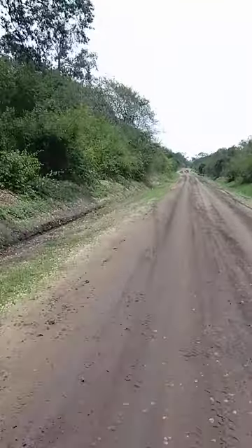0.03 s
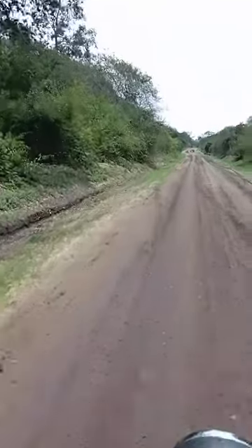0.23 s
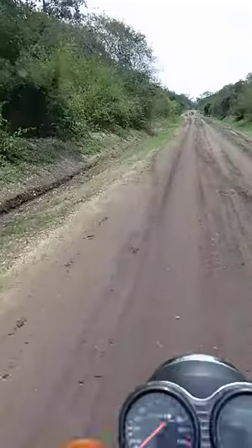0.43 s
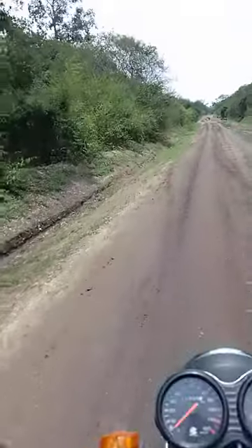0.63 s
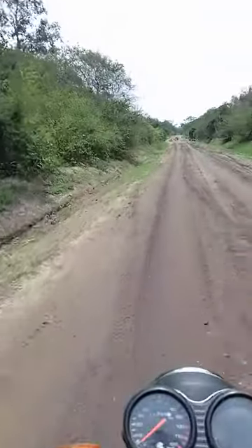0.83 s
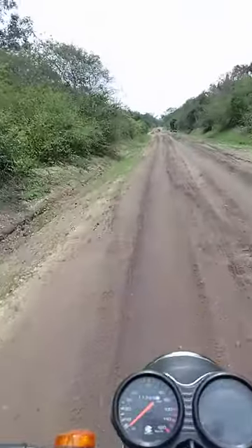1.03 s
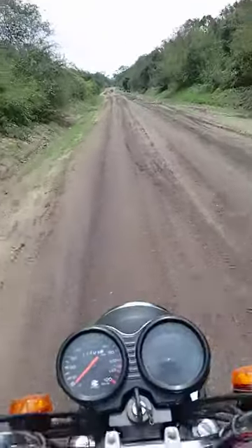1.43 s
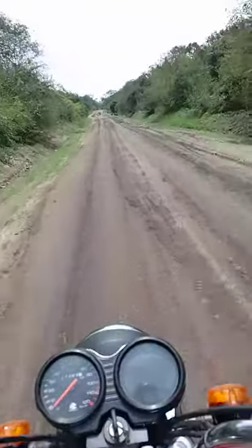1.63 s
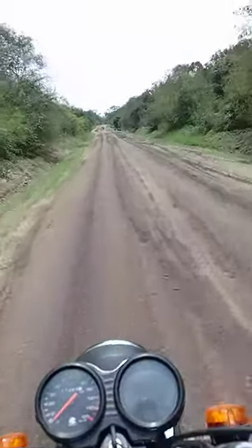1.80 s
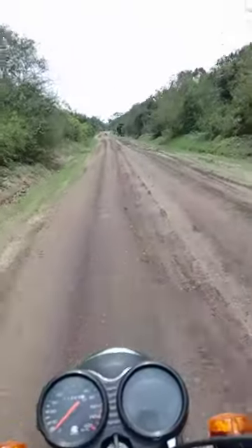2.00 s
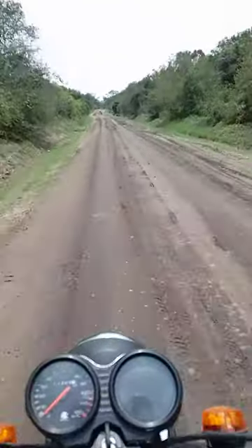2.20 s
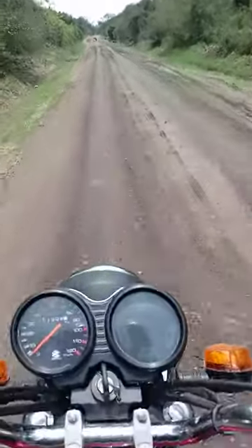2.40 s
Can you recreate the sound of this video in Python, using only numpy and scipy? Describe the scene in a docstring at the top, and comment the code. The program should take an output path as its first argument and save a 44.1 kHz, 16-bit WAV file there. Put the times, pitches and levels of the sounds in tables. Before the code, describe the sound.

A motorcycle engine thuds and clatters at low revs, heard from the saddle through gusty wind.

```python
"""A dirt road, heard from the saddle of a single-cylinder four-stroke motorcycle rolling at low revs.
Wind flutters on the microphone and now and then buffets it hard; handling adds a deep rumble.
Tyres crunch grit, loose parts rattle over bumps, the drive chain rasps and the valve gear clatters.
The exhaust thuds through the silencer once a cycle and fades as the throttle eases."""
import sys
import numpy as np
from scipy import signal
from scipy.fft import rfft, irfft, next_fast_len
from scipy.io import wavfile
from scipy.ndimage import uniform_filter1d

SR = 44100
rng = np.random.default_rng(int(sys.argv[2]) if len(sys.argv) > 2 else 0)


def persist_wave(psi):
    """Save psi, clipped to +-1, as 16-bit WAV."""
    counts = np.round(np.clip(psi, -1, 1) * 32767).astype(np.int16)
    wavfile.write(sys.argv[1], SR, np.atleast_2d(counts).T)


N = 112454
T = np.arange(N) / SR


def undb(db):
    """Decibels to gain."""
    return 10 ** (np.asarray(db) / 20)


def unit(x):
    """Scale to rms 1."""
    return x / np.sqrt(np.mean(x ** 2) + 1e-20)


def curve(rows):
    """Automation lane: straight lines between (t/s, value) points."""
    return np.interp(T, *np.array(rows).T)


def bursts(rows):
    """Envelope of hits with instant attack, from (t/s, level/dB, decay/s) rows."""
    return sum(undb(db) * (T > at) * np.exp(-np.abs(T - at) / decay) for at, db, decay in rows)


def noise():
    """White noise."""
    return rng.standard_normal(N)


def wobble(hz):
    """Smooth random modulation; rms 1."""
    span = max(int(SR / hz), 1)
    return unit(uniform_filter1d(uniform_filter1d(noise(), span, mode="wrap"), span, mode="wrap"))


def colour(x, eq):
    """Minimum-phase EQ through (f/Hz, level/dB) points; rms 1, so it sets tone only."""
    size = next_fast_len(N + 8192) // 2 * 2
    hz, db = np.array(eq).T
    bins_hz = np.maximum(np.fft.rfftfreq(size, 1 / SR), 1)
    gain = undb(np.interp(np.log(bins_hz), np.log(hz), db))
    cepstrum = irfft(np.log(gain))
    cepstrum[1:size // 2] *= 2
    cepstrum[size // 2 + 1:] = 0
    return unit(irfft(rfft(x, size) * np.exp(rfft(cepstrum)))[:N])


def ring(x, hz, width):
    """One resonance; rms 1."""
    return unit(signal.lfilter(*signal.iirpeak(hz, hz / width, SR), x))


def even(x, span_s):
    """Leveller: hold a turbulent signal near rms 1 over the given span."""
    span = int(span_s * SR)
    return x / np.sqrt(uniform_filter1d(uniform_filter1d(x ** 2, span), span) + 1e-9)


# Handling rumble tone: f/Hz, level/dB
RUMBLE_EQ = [(10, -15.5), (25, 7.5), (42, 4), (55, -6.5), (70, -20), (120, -59)]
# Rumble fader: t/s, level/dB
RUMBLE_FADER = [(0.22, -50), (0.6, -43), (0.67, -53), (1.03, -57), (1.13, -47), (1.35, -48), (1.47, -43),
                (1.9, -47), (2.2, -49), (2.33, -43), (2.55, -54)]


def handling():
    """Handling of the microphone adds a deep rumble."""
    return even(colour(noise(), RUMBLE_EQ), span_s=0.089) * undb(curve(RUMBLE_FADER))


# Wind flutter tone: f/Hz, level/dB
FLUTTER_EQ = [(60, -21), (72, -21), (98, -4.5), (160, 0.5), (220, 1.5), (300, -2), (400, -14), (500, -12.5),
              (650, -31.5), (1000, -46), (2000, -67.5)]
# Flutter fader: t/s, level/dB
FLUTTER_FADER = [(0.22, -35), (0.45, -31.5), (0.6, -33), (0.68, -35.5), (0.95, -36.5), (1.08, -29),
                 (1.25, -32), (1.35, -35), (1.55, -32), (1.76, -33), (2.0, -37.5), (2.15, -38.5),
                 (2.3, -35), (2.55, -42.5)]


def wind():
    """Eddies of wind flutter on the microphone."""
    eddy_db = 3
    eddies = noise() * undb(eddy_db * wobble(hz=83))
    return even(colour(eddies, FLUTTER_EQ), span_s=0.027) * undb(curve(FLUTTER_FADER))


# Wind hits: centre t/s, length/s, level/dB, crackle gain relative to the thump
BUFFET_CUES = [(0.23, 0.02, -26.5, 0.03), (0.26, 0.041, -20.5, 0.02), (0.311, 0.032, -26.5, 0.11),
               (0.351, 0.037, -24.5, 0.08), (0.37, 0.0081, -20, 0.16), (0.378, 0.027, -21.5, 0.01),
               (0.413, 0.018, -23.5, 0.11), (0.465, 0.013, -28, 0.03), (0.578, 0.033, -30, 0),
               (1.128, 0.032, -23, 0.02), (1.153, 0.01, -21, 0.16), (1.177, 0.036, -26.5, 0.11),
               (1.283, 0.015, -31, 0.13), (1.425, 0.0082, -24, 0.13), (1.447, 0.018, -18.5, 0.08),
               (1.477, 0.024, -17, 0.09), (1.499, 0.0057, -20, 0.38), (1.573, 0.019, -27, 0),
               (1.619, 0.011, -27, 0), (1.64, .025, -22, 0.13), (1.725, .012, -24.5, 0.06)]
# Tone of the thump and of the crackle: f/Hz, level/dB
THUMP_EQ = [(60, -24.5), (75, -25.5), (110, -7.5), (185, 4.5), (330, -2.5), (520, -8), (700, -18),
            (900, -26), (1250, -43), (2000, -59), (6000, -100)]
CRACKLE_EQ = [(100, -34.5), (400, 6.5), (900, 5), (1500, -9.5), (2200, -13), (3200, -33), (8000, -61)]


def buffets():
    """Gusts hit the microphone with a low thump; the sharpest also crackle."""
    thump_power, crackle_power = 0, 0
    for at, length, db, bright in BUFFET_CUES:
        power = undb(db) ** 2 * np.exp(-(2 * (T - at) / length) ** 4)  # flat-topped swell
        thump_power += power
        crackle_power += power * bright ** 2
    thump = even(colour(noise(), THUMP_EQ), span_s=0.01)
    crackle = even(colour(noise(), CRACKLE_EQ), span_s=0.0067)
    return np.sqrt(thump_power) * thump + np.sqrt(crackle_power) * crackle


# Tone of tyres on dirt and of fine sand: f/Hz, level/dB
ROAD_EQ = [(200, 2), (450, -4.5), (700, 1), (1100, -1), (1400, -6), (2200, -16), (3000, -21), (6000, -50)]
SAND_EQ = [(3000, -16.5), (6500, 2), (9000, 5), (12500, -5)]
# Tyre roll fader: t/s, level/dB
ROAD_FADER = [(0.22, -48), (0.6, -48.5), (0.9, -50), (1.3, -47.5), (1.8, -47), (2.13, -53), (2.27, -49.5),
              (2.55, -52)]
# Sand sprays: t/s, level/dB, decay/s
SPRAY_CUES = [(0.779, -70, .008), (0.819, -64, .006), (1.346, -63, .007), (1.462, -62, .007),
              (2.302, -67, .014)]


def tyres():
    """Tyres crunch dense grains of grit over a noise bed and throw up sprays of sand."""
    grains_per_s, spread_db = 900, 0.5
    grains = rng.random(N) < grains_per_s / SR
    grit = grains * noise() * undb(spread_db * rng.exponential(size=N))
    roll = colour(unit(grit) + noise(), ROAD_EQ) * undb(curve(ROAD_FADER))
    return roll + bursts(SPRAY_CUES) * colour(noise(), SAND_EQ)


# Broad tone of the engine casing: f/Hz, level/dB
CASING_EQ = [(700, -8), (1100, -5), (1270, -11.5), (1700, -0.5), (2350, -1), (2520, -11.5), (2950, -8),
             (3300, -2.5), (3700, -0.5), (4200, -1), (4600, -15), (5600, -21.5), (6500, -27), (7800, -38.5),
             (12000, -49)]


def casing(drive):
    """The casing's metallic colour, shared by rattles and valve gear; rms 1."""
    return colour(drive, CASING_EQ)


# Rattles over bumps: t/s, level/dB, decay/s
RATTLE_CUES = [(0.452, -56, .014), (0.563, -51, .012), (1.806, -45, .008), (2.251, -43, 0.008)]


def rattles():
    """Bumps jolt loose parts into short metallic ticks."""
    return bursts(RATTLE_CUES) * casing(noise())


# Engine speed: t/s, firing rate/Hz
FIRING_RATE = [(0.22, 18.7), (0.5, 18.3), (0.7, 18.0), (0.85, 18.6), (1.08, 18.7), (1.25, 19.5),
               (1.5, 19.8), (1.93, 20.4), (2.13, 19.3), (2.35, 19.8), (2.55, 19.8)]


def engine_cycle():
    """Running count of engine cycles; the exhaust fires on each whole number."""
    firing_s = 0.499  # one pulse lands here
    cycle = np.cumsum(curve(FIRING_RATE)) / SR
    return cycle - np.interp(firing_s, T, cycle)


def strokes(cycle, phase, scatter_db):
    """Seconds since the engine last passed this phase, and that stroke's random gain."""
    turn = np.floor(cycle - phase).astype(int)
    age = (cycle - phase - turn) / curve(FIRING_RATE)
    gains = undb(scatter_db * rng.standard_normal(128))
    return age, gains[turn % len(gains)]


# Tone of the fine hiss: f/Hz, level/dB
HISS_EQ = [(3000, -14.5), (5500, 2.5), (7500, -1.5), (11000, 0), (12600, -3)]


def engine_hiss(cycle):
    """A faint, flickering hiss swells once a cycle."""
    level_db, swing_db, flicker_db, peak_phase = -71, 4, 2.5, 0.11
    swell_db = swing_db * np.cos(2 * np.pi * (cycle - peak_phase))
    swell = undb(swell_db + flicker_db * wobble(hz=120))
    return undb(level_db) * colour(noise() * swell, HISS_EQ)


# Valve gear rhythm: phase after the exhaust pulse/cycles, relative level/dB, decay/s
KNOCK_PATTERN = [(0.098, -1, 0.0075), (0.21, -2.5, 0.0068), (0.51, -5.5, 0.0026), (0.83, 0.5, 0.0056)]


def knock_envelope(cycle):
    """Four knocks a cycle add in power to a steady whirr of gears."""
    power = 1.0  # the whirr
    for phase, db, decay in KNOCK_PATTERN:
        age, gain = strokes(cycle, phase, scatter_db=1.8)
        power += (2 * undb(db) * gain * np.exp(-age / decay)) ** 2
    return np.sqrt(power)


# Chain rasp tone: f/Hz, level/dB
CHAIN_EQ = [(900, -16), (1400, 2.5), (2300, 0.5), (2600, -4.5), (3900, -5), (4700, -3.5), (5500, -3),
            (6300, -11.5), (7600, -22), (12000, -36)]
# Chain fader: t/s, level/dB
CHAIN_FADER = [(0.22, -55), (0.42, -59.5), (0.455, -54.5), (0.51, -56), (0.56, -55), (0.62, -57),
               (0.7, -58), (0.9, -59), (1.5, -60), (1.9, -64), (2.55, -61.5)]


def chain(knocks):
    """The drive chain rasps under load, pulsing with the knocks."""
    return colour(noise() * knocks, CHAIN_EQ) * undb(curve(CHAIN_FADER))


# Ringing modes of the casing: f/Hz, width/Hz, relative level/dB
CASING_MODES = [(1092, 32, 5.5), (1389, 45, -1), (1642, 58, -3), (1850, 48, -15), (2060, 20, -10.5),
                (2236, 20, -1), (2368, 44, -1.5), (3251, 33, -3), (3940, 33, -1), (4270, 150, -9.5),
                (5300, 90, -19)]
# Clatter fader: t/s, level/dB
CLATTER_FADER = [(0.22, -56), (0.42, -54.5), (0.455, -46), (0.51, -51.5), (0.56, -48.5), (0.7, -51.5),
                 (1.1, -52), (1.45, -50), (1.82, -49.5), (2.15, -51.5), (2.3, -50.5), (2.55, -51.5)]


def valve_gear(knocks):
    """The valve gear knocks on the casing and sets its modes ringing."""
    ring_db = -2
    modes = unit(sum(undb(db) * ring(noise() * knocks, hz, width) for hz, width, db in CASING_MODES))
    clatter = casing(noise() * knocks) + undb(ring_db) * modes
    return unit(clatter) * undb(curve(CLATTER_FADER))


# Silencer tone: f/Hz, level/dB
SILENCER_EQ = [(40, -33.5), (75, -25), (120, 0.5), (210, -1.5), (330, -5), (520, -28), (800, -39),
               (2000, -49.5), (6000, -110)]
# Exhaust fader, riding the throttle: t/s, level/dB
THROTTLE_FADER = [(0.22, -40.5), (0.7, -37.5), (1.0, -37), (1.4, -40), (1.8, -41), (2.1, -44.5),
                  (2.55, -49.5)]


def exhaust(cycle):
    """Each firing sends a pressure pulse and a short puff of gas through the silencer."""
    puff_decay_s, puff_db = 0.0026, -9.5
    age, gain = strokes(cycle, phase=0, scatter_db=1.2)
    pulses = (np.diff(age, prepend=0) < 0) * gain  # one impulse as each cycle restarts
    puffs = noise() * gain * np.exp(-age / puff_decay_s)
    thuds = colour(pulses, SILENCER_EQ) + undb(puff_db) * colour(puffs, SILENCER_EQ)
    return unit(thuds) * undb(curve(THROTTLE_FADER))


def scene():
    """Mono mix at the saddle: wind, handling, road and engine."""
    cycle = engine_cycle()
    knocks = knock_envelope(cycle)
    engine = engine_hiss(cycle) + chain(knocks) + valve_gear(knocks) + exhaust(cycle)
    return (wind() + handling() + buffets() + tyres() + rattles() + engine)[None]


def record(dry):
    """The sound cuts in after a short silence; a steep low-pass takes off the top."""
    start_s, fade_s, top_hz = 0.2225, 0.001, 12600
    gate = np.clip((T - start_s) / fade_s, 0, 1)
    lowpass = signal.ellip(10, 0.2, 70, top_hz, fs=SR, output="sos")
    return signal.sosfilt(lowpass, dry * gate)


dry = scene()
out = record(dry)
persist_wave(out)
```